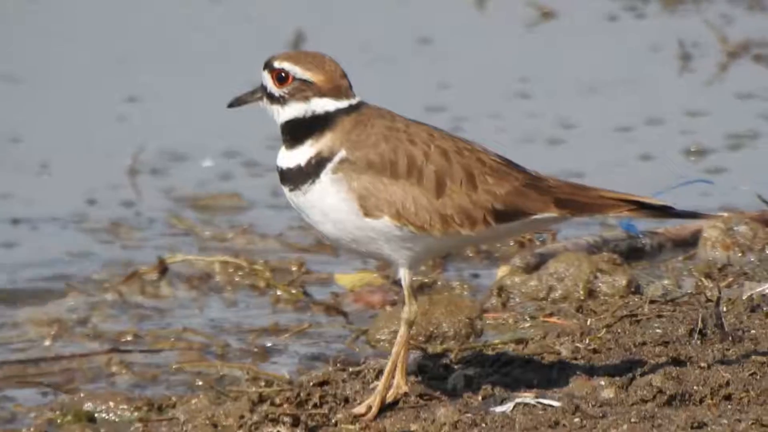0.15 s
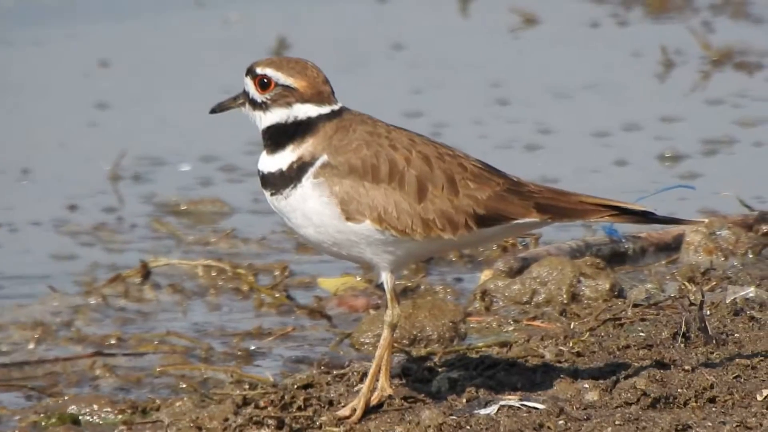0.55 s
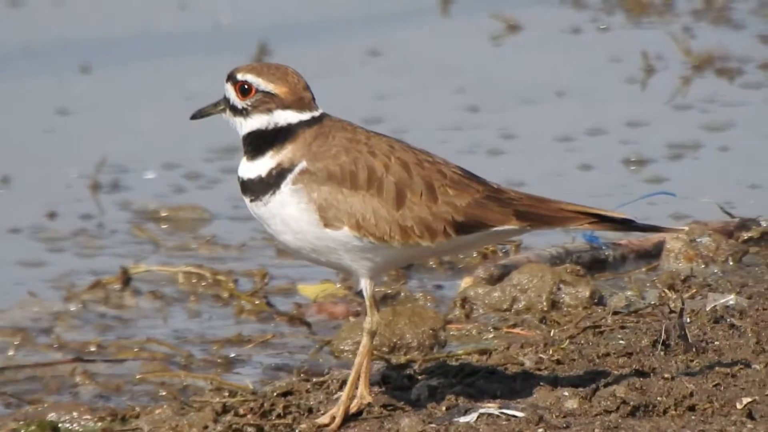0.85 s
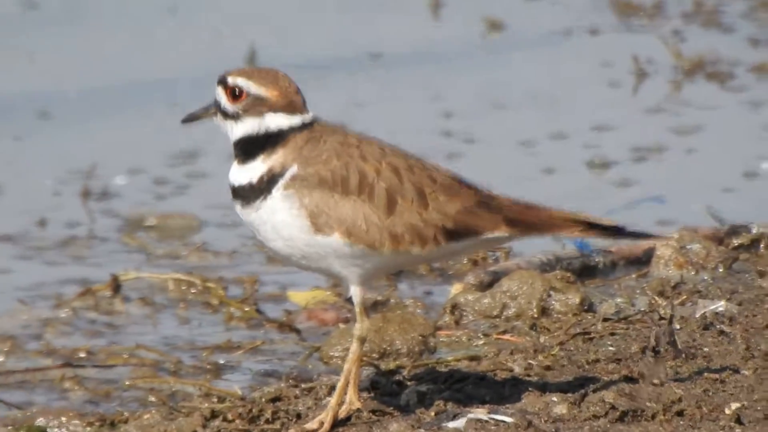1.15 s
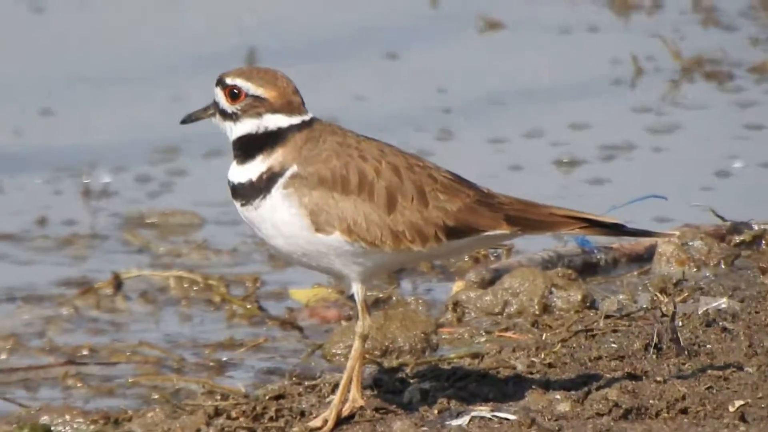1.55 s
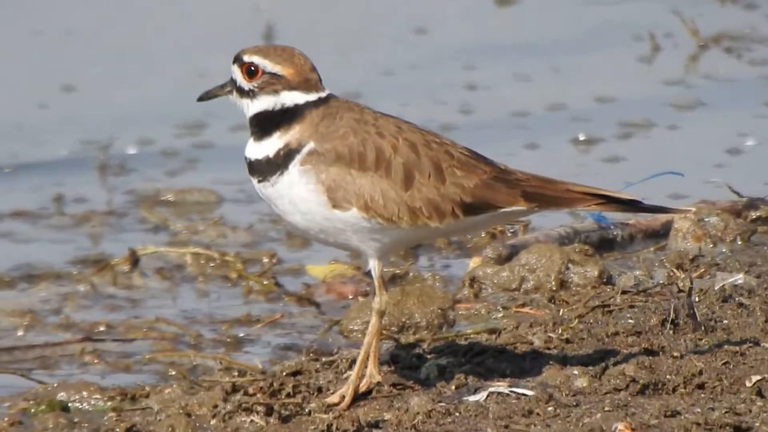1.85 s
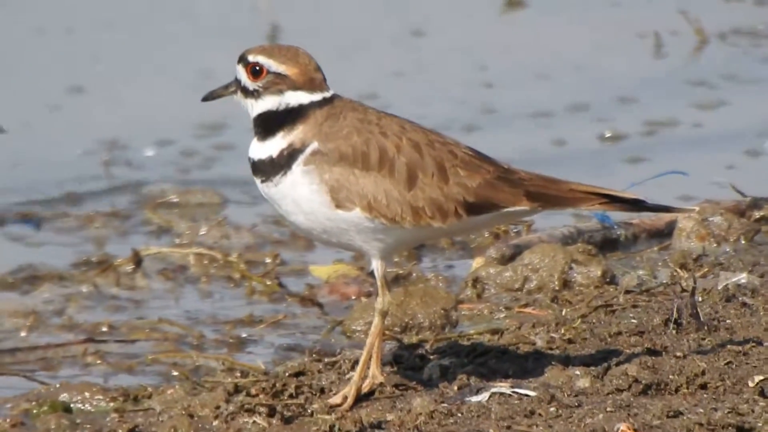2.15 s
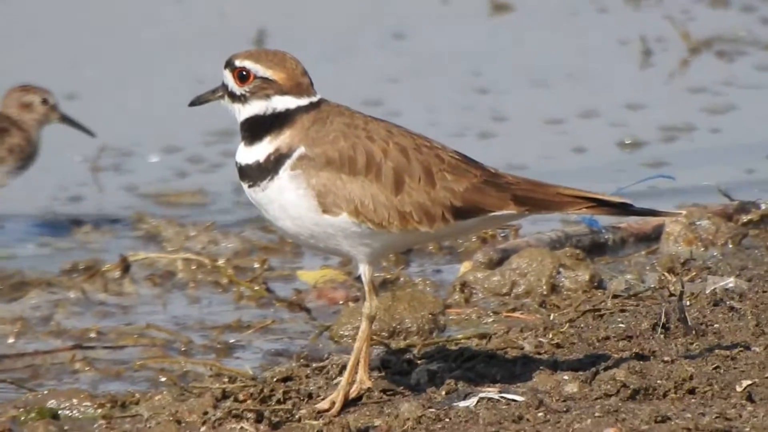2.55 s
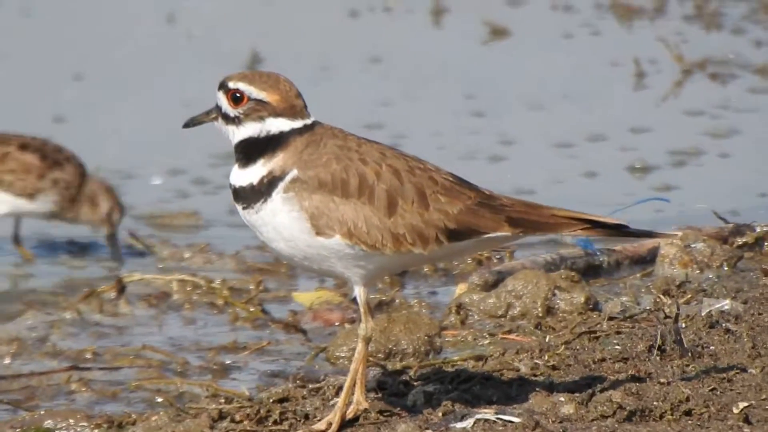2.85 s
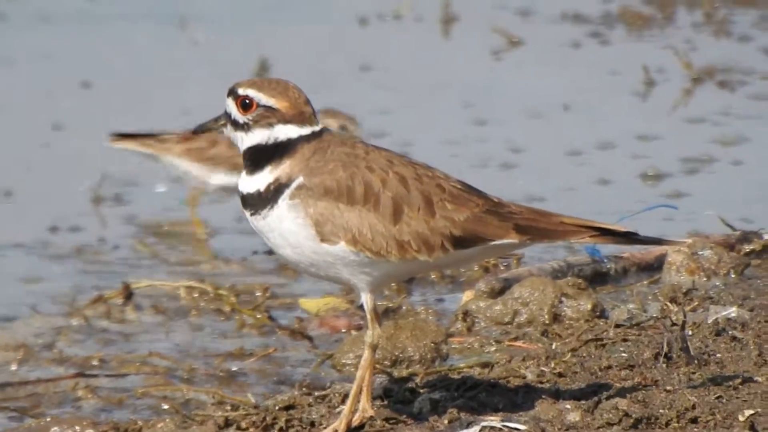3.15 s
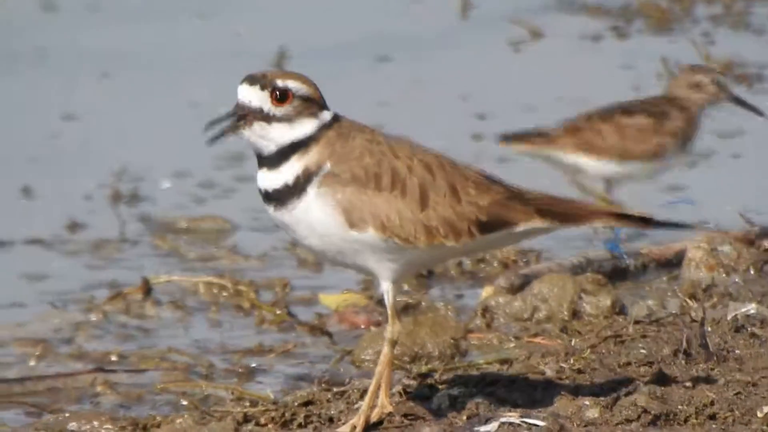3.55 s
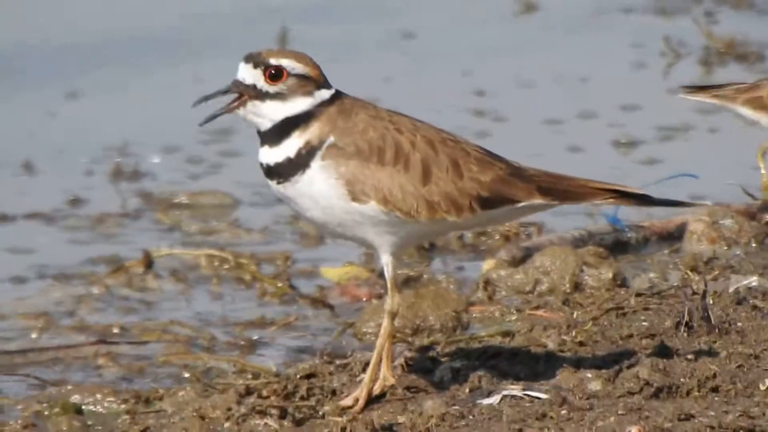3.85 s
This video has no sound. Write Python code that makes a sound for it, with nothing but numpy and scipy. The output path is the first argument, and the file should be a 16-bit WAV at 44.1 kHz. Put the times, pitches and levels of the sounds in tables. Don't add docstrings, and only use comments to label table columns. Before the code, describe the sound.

Shorebird yaps dominate: from 0.7 s to the end, short nasal notes every 0.17-0.3 s swoop upward and stop abruptly, left of centre, strongest around 1.2-1.4 s, later somewhat weaker. Thin, fast sandpiper chirps scatter throughout over faint distant peeping, soft hiss and low wind and machinery rumble. A faint wing flick comes near 2.95 s; at 3.57 s a plover's hooked note leads into a long rising whistle. Slight outdoor echo.

```python
import sys
import numpy as np
from scipy import signal
from scipy.fft import rfft, irfft
from scipy.io import wavfile
from scipy.ndimage import uniform_filter1d

SR = 44100
rng = np.random.default_rng(int(sys.argv[2]) if len(sys.argv) > 2 else 0)


def master_out(mix):
    frames = np.transpose(np.atleast_2d(mix))
    ceiling = np.clip(frames, -1, 1)
    pcm = np.round(ceiling * 32767).astype(np.int16)
    wavfile.write(sys.argv[1], SR, pcm)


def gain_from_db(level_db):
    decades = np.asarray(level_db, float) / 20
    return 10 ** decades


N = 176400

# centre_hz, width_hz, level_db
RUMBLE_HUMPS = [(65.2, 17.5, -38.5), (85.6, 10.4, -43.5), (135.7, 67, -44), (185.1, 65, -42),
                (230.5, 20, -49), (302.3, 122, -51), (597, 149, -53)]
# freq_hz, side_minus_mid_db
BACKGROUND_WIDTH = [(60, -27), (500, -14), (2000, -6), (9000, 0.5)]
# freq_hz, density_db (per Hz)
AIR_COLOUR = [(900, -11), (1700, -13), (3000, -15.5), (4660, -4.5), (6200, -18), (8200, -30.5),
              (15500, -37.5)]
# centre_s, level_db
WING_FLICKS = [
    (1.427, -48),
    (2.953, -36),
]
# start_s, length_s, from_hz, to_hz, level_db
TWITTER_GLIDES = [(0.094, 0.021, 4300, 6200, -37), (0.116, 0.025, 6200, 6800, -37.5),
                  (0.141, 0.013, 3520, 5560, -31), (0.166, 0.028, 5150, 3560, -28),
                  (0.328, 0.044, 3640, 3550, -39), (0.366, 0.021, 3450, 2670, -47.5),
                  (0.493, .03, 4700, 6100, -44), (0.51, 0.047, 3450, 5000, -36.5),
                  (0.559, 0.03, 3900, 2300, -45), (0.734, .025, 4800, 6670, -39),
                  (1.45, 0.022, 5460, 6230, -52), (1.519, .045, 5960, 6960, -44),
                  (2.03, 0.16, 2100, 2080, -58), (2.072, 0.015, 4700, 4030, -33.5),
                  (2.084, 0.021, 4920, 3630, -36), (2.422, 0.038, 4900, 6130, -40),
                  (2.476, 0.041, 3800, 2720, -40), (2.505, .018, 3860, 4700, -28.5),
                  (2.556, 0.071, 3530, 2740, -47), (2.82, 0.023, 6500, 5600, -43),
                  (0.048, 0.024, 4800, 4170, -37), (0.761, .04, 2800, 3210, -47),
                  (0.861, 0.11, 3130, 2730, -42), (0.974, 0.017, 5400, 4170, -43),
                  (1.731, 0.015, 3500, 5270, -33.5), (1.761, 0.013, 5430, 3690, -27),
                  (3.765, 0.06, 4400, 2400, -40), (2.994, 0.033, 4700, 5300, -39),
                  (3.006, 0.023, 5230, 6700, -41), (2.991, 0.06, 2090, 2070, -55),
                  (3.175, .013, 3930, 5160, -32.5), (3.2, 0.036, 4900, 3760, -33),
                  (3.244, .015, 3310, 5300, -30.5), (3.392, 0.17, 2100, 2000, -53),
                  (3.334, 0.018, 6200, 7550, -42.5), (3.475, .016, 5470, 6740, -38),
                  (3.976, .015, 5600, 7000, -37)]
# start_s, length_s, crest_hz, end_drop_hz, level_db
TWITTER_ARCHES = [ (.097, .06, 5700, 500, -40), (.185, .06, 5600, 400, -43), (.214, .022, 4900, 1500, -35),
                  (.405, .047, 4960, 760, -36), (.541, .018, 4700, 800, -37),
                  (1.247, .019, 4900, 1100, -34), (1.264, .022, 4300, 800, -35),
                  (1.295, .04, 4310, 600, -33), (1.313, .028, 6100, 600, -40),
                  (1.811, .019, 4900, 1400, -33), (1.87, .095, 6400, 700, -41), (2.06, .02, 4800, 800, -41),
                  (2.14, .052, 5500, 600, -36), (2.451, .016, 4900, 1100, -32),
                  (2.467, .013, 4500, 600, -34), (3.029, .019, 5150, 1200, -34),
                  (3.048, .014, 4500, 500, -35), (3.079, .014, 4300, 400, -39), (3.72, .12, 2080, 40, -54),
                  (3.753, .022, 4860, 950, -35)]
# crest_s, hold_s (after the crest), crest_hz, level_db
YAP_CALLS = [(0.687, 0.00029, 1146, -14.5), (0.861, 0.00038, 1148, -17), (1.035, 0.00045, 1173, -19),
             (1.213, 0.0021, 1196, -11.5), (1.389, 0.0027, 1210, -11.5), (1.604, 0.0034, 1212, -15),
             (1.805, 0.004, 1214, -17), (2.005, 0.0014, 1233, -15), (2.205, 0.0026, 1238, -19.5),
             (2.413, 0.00091, 1241, -17), (2.694, 0.0051, 1226, -18), (2.916, 0.002, 1234, -18.5),
             (3.151, 0.0045, 1199, -20.5), (3.392, 0.0054, 1191, -24), (3.656, 0.0049, 1209, -17),
             (3.966, 0.0078, 1214, -22.5)]
# length_s, notch1_hz, notch2_hz
WATER_NOTCHES = [(0.028, 3400, 6300), (.027, 3400, 6070), (.030, 5270, 6680), (0.032, 4650, 5550),
                 (0.032, 5300, 6700), (.031, 3240, 6660), (.032, 5160, 7300), (.032, 3880, 5600),
                 (.031, 5800, 7120), (0.034, 3870, 6200), (0.033, 3510, 6700), (0.037, 3330, 7050),
                 (0.036, 4450, 4960), (0.034, 5130, 7200), (.031, 5100, 7100), (0.035, 3350, 5000)]
# low_db, third_db (also steers 8 and up), fifth_db, top_db (6
# and 7), left_lead_db
YAP_PATHS = [(-19.5, 8, -1, -2.5, 8.5), (-12.5, 5.5, -8.5, -7, 8.5), (-9, 5.5, 6.5, -4.5, 11),
             (-15.5, 4, -5.5, -10, 9), (-14.5, 1, -2, -15.5, 7.5), (-5.5, -2.5, 0.5, -0.5, 7.5),
             (-8.5, -1, -4, -4.5, 4.5), (-12.5, -1.5, 0.5, -7.5, 5.5), (-4, -6.5, 2, -4, 5.5),
             (-2.5, -10, -2, -7.5, 4.5), (-1, 0, 2.5, -10, 6.5), (-4, -3.5, 0, -7, 6),
             (-3, -5, -4, -11, 7.5), (-1, -1, -8, -17, 7.5), (-6.5, -4, -12, -21.5, 6),
             (-1.5, -3.5, -9, -18, 6)]
# freq_hz, level_db
THROAT_COLOUR = [(1100, -18.5), (2300, -1.5), (3100, -3.5), (4700, 2), (6000, 1), (7300, -5), (8600, -43.5),
                 (10300, -33.5), (13000, -52.5)]
# overtone (number), level_db
OVERTONE_SWELL = [(1, -14), (2, -8), (3, -10.5), (4, -12.5), (5, -21.5), (6, -3.5), (7, -17), (13, -6)]
# time_s, pitch_hz, level_db, second_partial_lift_db
PLOVER_HOOK = [
    (3.566, 2127, -53, 12),
    (3.571, 2300, -54, 23),
    (3.58, 2411, -52.5, 22.5),
    (3.598, 2328, -54.5, 24.5),
    (3.609, 2244, -68.5, 26),
    (3.619, 2152, -60.5, 22),
]
# time_s, pitch_hz, level_db, second_partial_lift_db
PLOVER_RISE = [
    (3.665, 2163, -59, 22.2),
    (3.72, 2244, -68, 13),
    (3.74, 2220, -57.5, 16.4),
    (3.812, 2282, -54.5, 22.4),
    (3.874, 2309, -53.5, 24.3),
    (3.945, 2334, -54.5, 23.8),
    (4.0, 2395, -51.5, 21.7),
]
PLOVER_PARTIALS_DB = [1, 6, 17, 4, -16.5, -25]


def curve(points, hz):
    p = np.array(points, float)
    return np.interp(np.log(np.maximum(hz, 1)), np.log(p[:, 0]), p[:, 1])


def walk(rate_hz):
    k = int(SR / rate_hz)
    steps = np.repeat(rng.standard_normal(N // k + 1), k)
    w = uniform_filter1d(uniform_filter1d(steps, k), k)[:N]
    return w / w.std()


def wide(shape):
    hz = np.arange(N // 2 + 1) * SR / N
    mid_bins, side_bins = rfft(rng.standard_normal((2, N))) * shape(hz)
    mid = irfft(mid_bins, N)
    side = irfft(side_bins * gain_from_db(curve(BACKGROUND_WIDTH, hz)), N)
    return np.array([mid + side, mid - side]) / mid.std()


def add(out, start_s, x):
    i = int(start_s * SR)
    out[:, i:i + x.shape[1]] += x[:, :N - i]


def pan(db):
    return gain_from_db(np.array([[db / 2], [-db / 2]]))


def rumble():
    gust = walk(1.73)
    out = np.zeros((2, N))
    for centre_hz, width_hz, db in RUMBLE_HUMPS:
        def hump(f):
            low_cut = 1 + (48 / (f + 1)) ** 8
            return 1 / (1 + ((f - centre_hz) / width_hz * 2) ** 2) / low_cut
        out += gain_from_db(db + 1.1 * gust + 1.3 * walk(12.0)) * wide(hump)
    return out


def air():
    t = np.arange(N) / SR
    hiss = np.zeros((2, N))
    for hz in 800 * 2 ** np.arange(0, 4.5, 1 / 3):
        band = wide(lambda f: np.exp(-(np.log2(f / hz + 1e-9) * 3) ** 2))
        patch_db = 3.94 * np.clip(6000 / hz, .3, 1) * walk(9)
        hiss += gain_from_db(curve(AIR_COLOUR, hz) + patch_db) * hz ** .5 * band
    flick = sum(gain_from_db(db) * np.exp(-((t - s) / 0.011) ** 2) for s, db in WING_FLICKS)
    return gain_from_db(-45.5) * hiss / hiss.std() + flick * wide(lambda f: gain_from_db(curve(THROAT_COLOUR, f)))


def peep(length_s, path, db, chance):
    hoarse_db = 4
    u = np.arange(int(length_s * SR)) / (length_s * SR)
    turn = 2 * np.pi * np.cumsum(path(u)) / SR
    rasp = signal.resample(rng.standard_normal(64), 8192)[:len(u)]
    env = np.sin(np.pi * u) ** .6 * gain_from_db(hoarse_db * np.tanh(rasp - rasp.mean()))
    lag = .5 * chance[0] * np.array([[1], [-1]])
    return gain_from_db(db) * env * np.sin(turn + lag) * pan(3.13 * chance[1])


def sandpipers():
    out = np.zeros((2, N))
    chances = rng.standard_normal((len(TWITTER_GLIDES), 2))
    for (s, length_s, from_hz, to_hz, db), c in zip(TWITTER_GLIDES, chances):
        add(out, s, peep(length_s, lambda u: from_hz + (to_hz - from_hz) * u, db, c))
    chances = rng.standard_normal((len(TWITTER_ARCHES), 2))
    for (s, length_s, crest_hz, drop_hz, db), c in zip(TWITTER_ARCHES, chances):
        roundness = np.clip(length_s * 55, 1.2, 3)
        add(out, s, peep(length_s, lambda u: crest_hz - drop_hz * np.abs(2 * u - 1) ** roundness, db, c))
    return out


def far_flock():
    out = np.zeros((2, N))
    for s, c in zip(rng.uniform(0, 4, size=600), rng.standard_normal((600, 6))):
        hz = 4700 * np.exp(0.17 * c[2])
        path = lambda u: hz * (1 + 0.196 * c[3] * (u - .5) - 0.1053 * (2 * u - 1) ** 2)
        add(out, s, peep(.028 * np.exp(.4 * c[4]), path, -51.5 + 3 * np.tanh(c[5]), c))
    return out


def yaps():
    swoop_hz, swoop_bend, roughness = 221.8, 1.823, 0.0014
    open_s, close_s, breath_db = 0.0054, 0.0056, -25.5
    creak_s, creak_db, creak_hz_per_s = .012, -16.5, 22260
    notch_hz, bounce_share, left_early_s = 225, 0.86, .000015
    out, flutter = np.zeros((2, N)), walk(400)
    breath = wide(lambda f: gain_from_db(curve(THROAT_COLOUR, f)))
    k = np.arange(1, 14)[:, None]
    for call, (length, *dips), path in zip(YAP_CALLS, WATER_NOTCHES, YAP_PATHS):
        crest, hold, hz, db = call
        low_db, third_db, fifth_db, top_db, lead_db = path
        t = np.arange(-length - creak_s, hold + 2 * close_s, 1 / SR)
        i = int((crest + t[0]) * SR)
        here = slice(i, i + len(t))
        early, shake = np.abs(t / length), flutter[here]

        creak_drop = creak_hz_per_s * np.maximum(-t - length, 0)
        pitch = (hz - swoop_hz * early ** swoop_bend - creak_drop) * (1 + roughness * shake)
        fk = k * pitch
        turn = 2 * np.pi * k * np.cumsum(pitch) / SR + k ** 2

        opened = 1 / (1 + np.exp(-(t + length) * 4 / open_s))
        creak = gain_from_db(creak_db + 5 * np.tanh(shake)) * (t - t[0]) / creak_s
        shut = 1 + np.exp((t - hold) * 4 / close_s)
        gate = (opened + (1 - opened) * creak) / shut
        env = gate * gain_from_db(curve(OVERTONE_SWELL, k) * np.minimum(early, 1) ** 2)

        path_db = [low_db, third_db, 0, fifth_db, top_db, top_db, 2 * third_db - 6]
        tone = curve(THROAT_COLOUR, fk) + np.interp(k, [2, 3, 4, 5, 6, 7, 8], path_db)
        lead = lead_db * np.interp(fk, [2300, 4530, 6200, 7500], [1.0, 0.16, 0.68, 0.14])
        for ch, side in enumerate((1, -1)):
            bounce = np.prod([1 - bounce_share / (1 + ((d - fk + 30 * side) / notch_hz) ** 2) for d in dips], axis=0)
            lag = np.pi * fk * side * left_early_s * 2
            partials = gain_from_db(db + tone + side * lead / 2) * bounce * np.sin(turn + lag) * env
            out[ch, here] += partials.sum(axis=0)
            out[ch, here] += gain_from_db(db + breath_db) * gate ** .5 * breath[ch, here]
    return out


def plover():
    onset = (PLOVER_HOOK[0][0] - .004, PLOVER_HOOK[0][1], -90, 0)
    c = np.array([onset] + PLOVER_HOOK + PLOVER_RISE)
    t = np.arange(c[0, 0], N / SR, 1 / SR)
    pitch, db, lift = (uniform_filter1d(np.interp(t, c[:, 0], c[:, j]), size=160) for j in (1, 2, 3))
    waver = 1 + 0.002 * walk(60)[:len(t)]
    turn = 2 * np.pi * np.cumsum(pitch * waver) / SR
    out = np.zeros((2, N))
    for k, partial_db in enumerate(PLOVER_PARTIALS_DB):
        lag = np.array([[1], [-1]]) * 0.18 * (k + 1)
        level = 2 ** .5 * gain_from_db(db + partial_db + lift * (k == 1))
        add(out, t[0], level * np.sin((k + 1) * turn + lag) * pan(-1.5))
    return out


def bank_echo(birds):
    echo_db, t60_s = -20.5, 0.31
    t = np.arange(int(.5 * SR)) / SR
    tail = rng.standard_normal((2, len(t))) * gain_from_db(-60 * t / t60_s)
    tail = tail * gain_from_db(echo_db) / np.sqrt((tail ** 2).sum(axis=1, keepdims=True))
    return signal.fftconvolve(birds.mean(axis=0, keepdims=True), tail, axes=1)[:, :N]


def scene():
    background = rumble() + air()
    birds = sandpipers() + far_flock() + yaps() + plover()
    return background + birds + bank_echo(birds)


def top_cut(x):
    return signal.sosfilt(signal.butter(12, 15720, fs=SR, output="sos"), x)


def record(dry):
    start_s, fade_s = 0.055, 0.013
    t = np.arange(N) / SR
    x = dry * np.clip((t - start_s) / fade_s + 1, 0, 1) ** 3
    return top_cut(x - 0.04 * x ** 3)


dry = scene()
out = record(dry)
master_out(out)
```